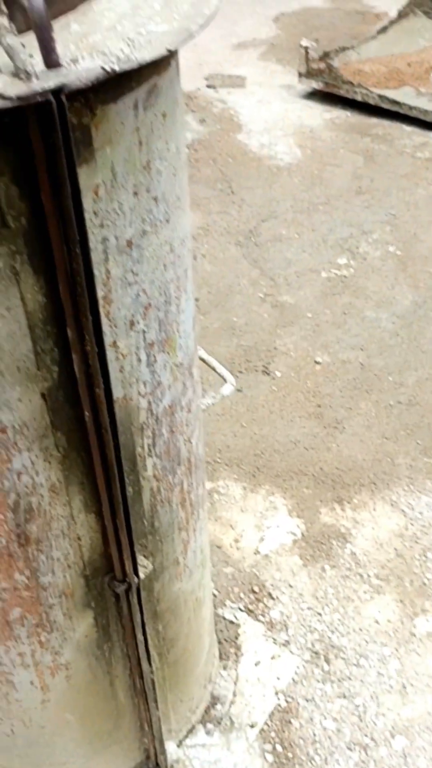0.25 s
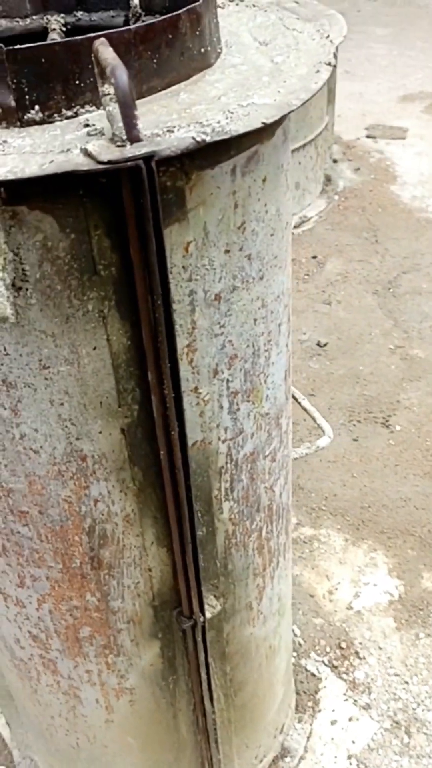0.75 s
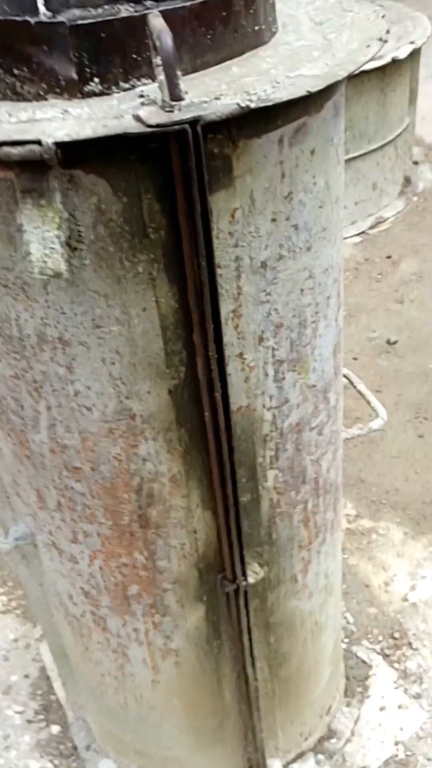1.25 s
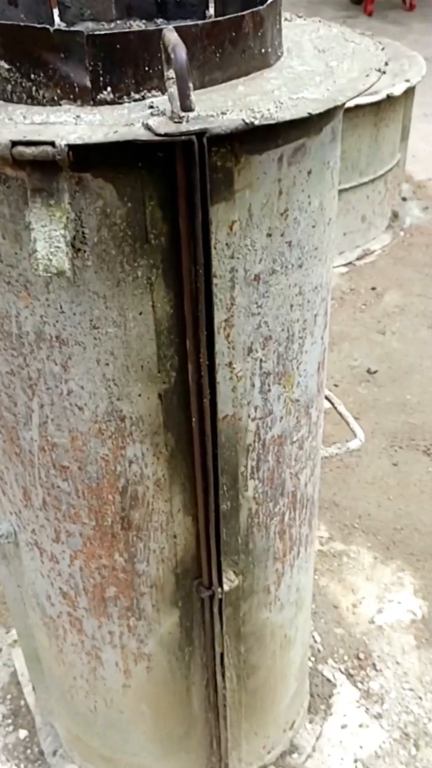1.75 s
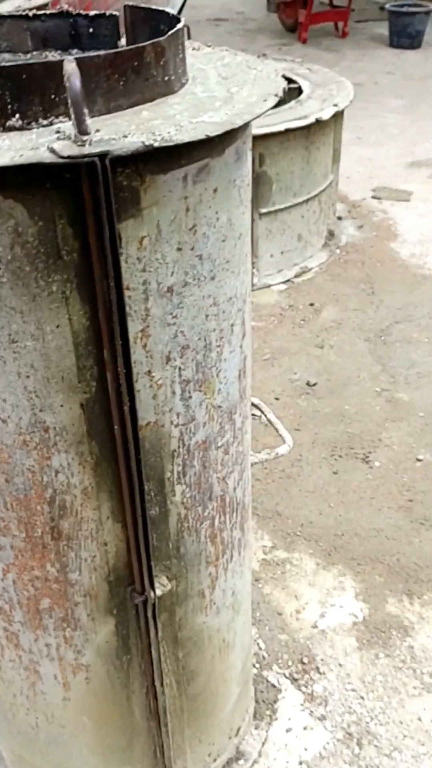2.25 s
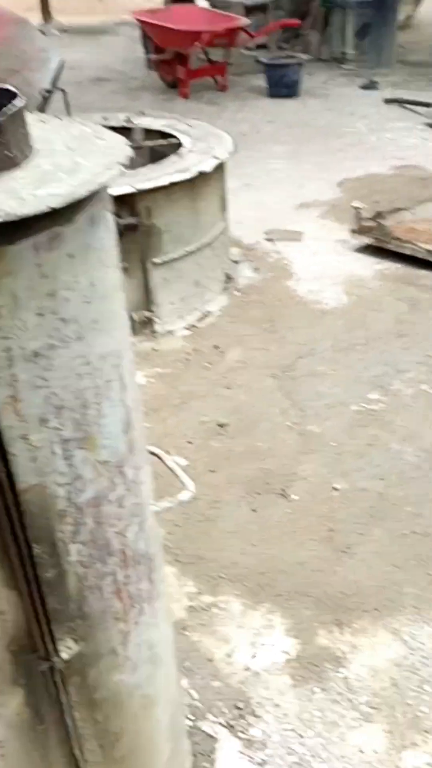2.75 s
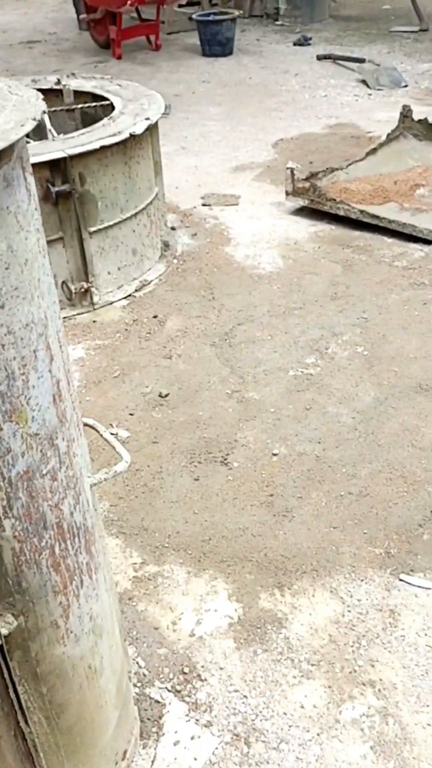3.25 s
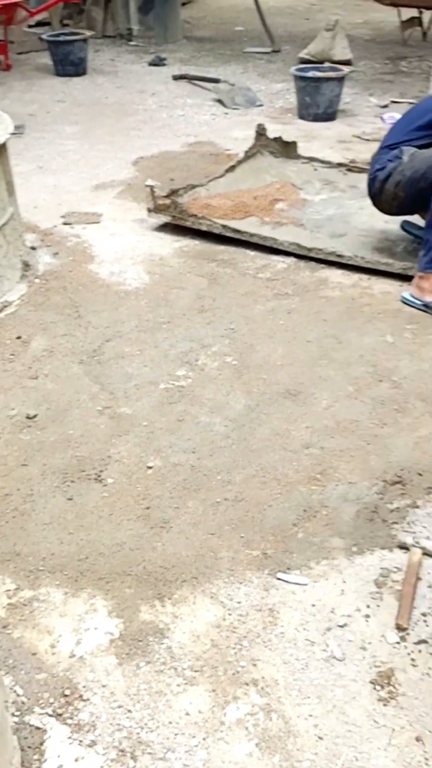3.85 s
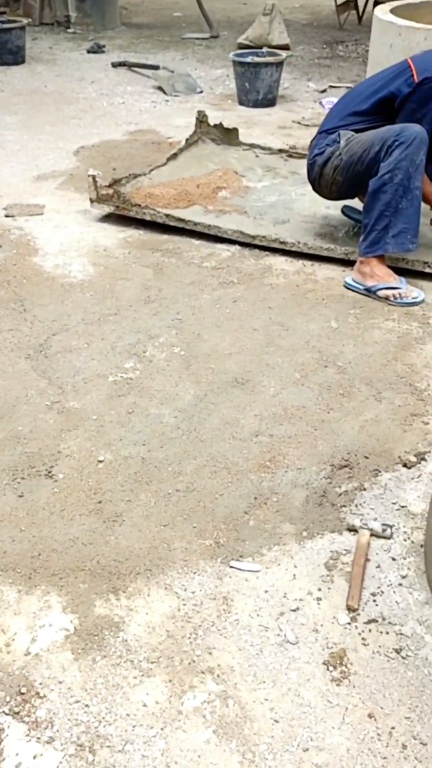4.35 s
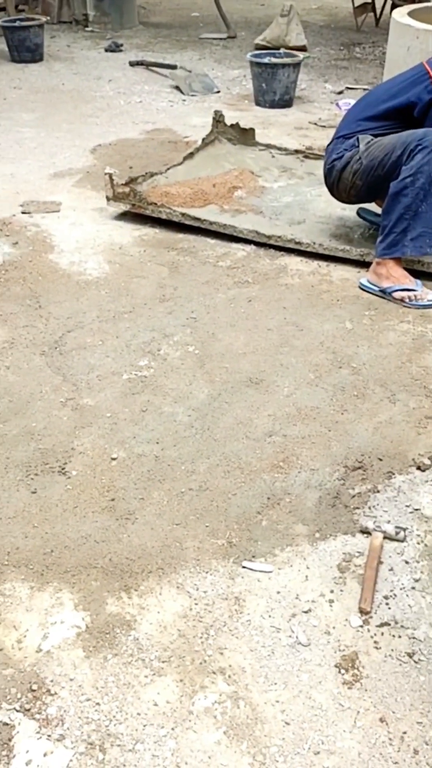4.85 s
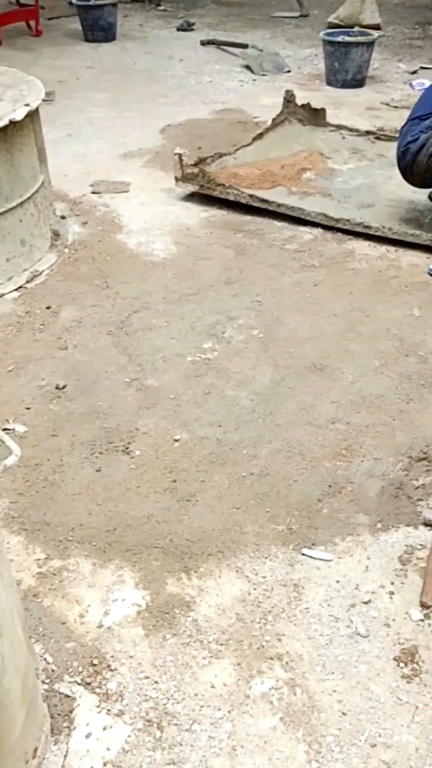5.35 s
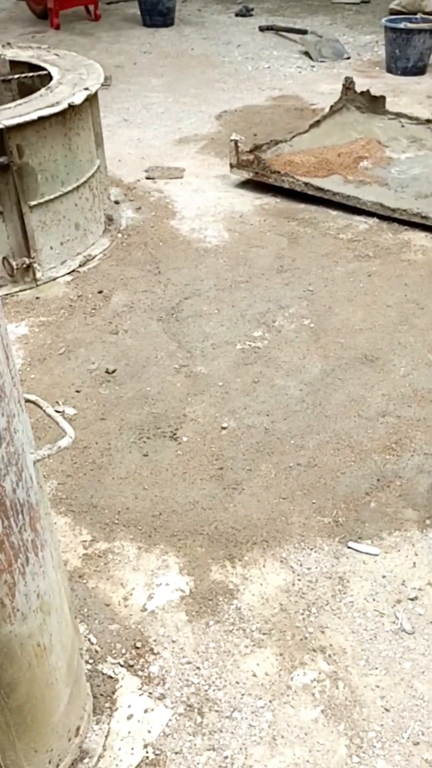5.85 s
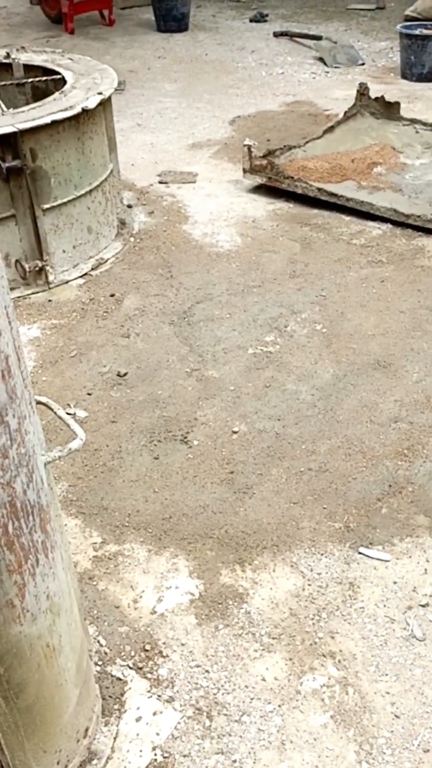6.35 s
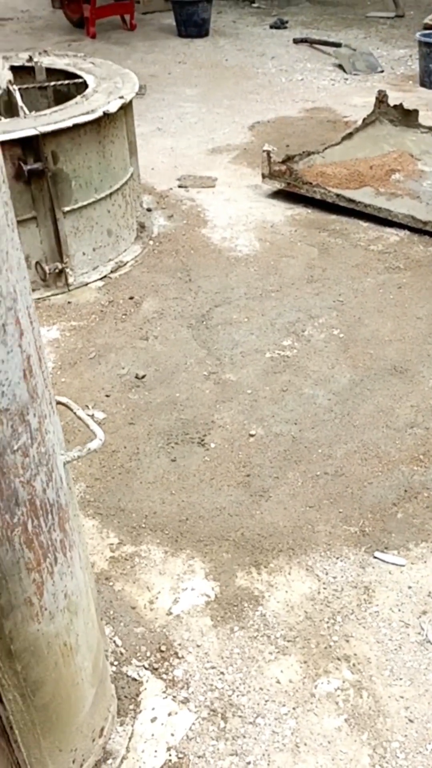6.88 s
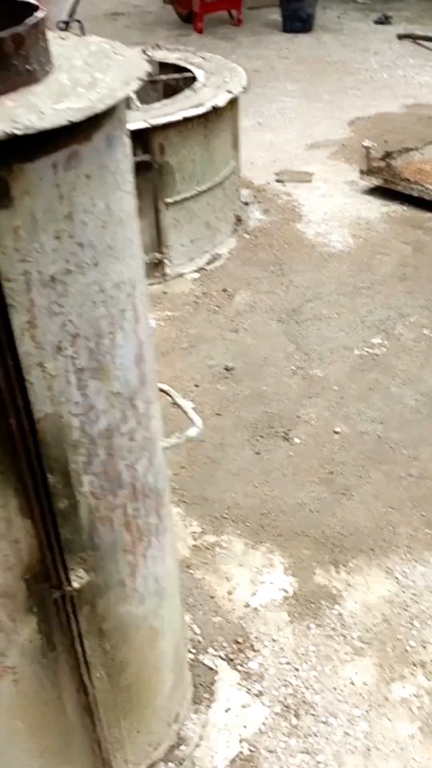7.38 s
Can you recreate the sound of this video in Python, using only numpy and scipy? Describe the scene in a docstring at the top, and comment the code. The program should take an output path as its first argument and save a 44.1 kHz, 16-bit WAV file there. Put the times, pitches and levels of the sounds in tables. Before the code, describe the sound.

Close, dry outdoor sound of a shovel working wet gritty concrete on a steel tray. Uneven drags rasp and boom from the start, stones knock and chips tick, and the metal edge clangs around three and five seconds. After a last hard pair of scrapes the work stops, leaving a few small scuffs and very faint air.

```python
"""An open yard: a shovel scrapes wet, gritty concrete over a steel tray, above a faint wash of air.
Filtered noise and grains, levelled stroke by stroke, make the tray boom, the blade rasp and the sand hiss.
Loose stones knock and chips tick as short damped tones; the edge clangs in pairs of beating tones.
Gliding narrow noise bands ring, scuff, hum and squeal."""
import sys
import numpy as np
from scipy import signal
from scipy.fft import rfft, irfft, next_fast_len
from scipy.io import wavfile
from scipy.ndimage import uniform_filter1d, map_coordinates

SR = 44100
rng = np.random.default_rng(int(sys.argv[2]) if len(sys.argv) > 2 else 0)


def unload_wav(signal):
    """Save mono or channel-first audio to the path in sys.argv[1] as 16-bit WAV at rate SR, clipped to [-1, 1]."""
    wavfile.write(
        sys.argv[1],
        SR,
        np.round(np.clip(np.atleast_2d(signal).T, -1, 1) * 32767).astype(np.int16),
    )


N = 336042  # samples
TOP_HZ = 15800  # band limit

# Yard spectrum. Each row: frequency in Hz, relative level in dB.
YARD_SPECTRUM = [(25, -31), (70, 4), (150, -3.5), (300, -13), (1000, -18), (2000, -16), (5000, -26),
                 (7000, -9), (7600, -32), (12000, -22), (15300, -18), (16400, -21.5)]
YARD_RMS_DB = -56

# Narrow moving bands. Each row: start in s, end in s, start in Hz, end in Hz, width in Hz,
# rms in dB before the swell and fade.
WARBLE_BANDS = [(0.301, 0.363, 936, 974, 141, -11.5), (1.639, 1.944, 1201, 1230, 178, -20.5),
                (2.112, 2.435, 1150, 1200, 246, -36), (2.856, 2.919, 884, 895, 216, -30),
                (2.927, 2.951, 860, 790, 248, -25.5), (3.105, 3.239, 2240, 2380, 200, -23),
                (3.507, 3.677, 1834, 2060, 80, -37), (3.595, 3.694, 3050, 3070, 80, -42),
                (5.104, 5.403, 127.2, 134.7, 41, -38), (5.508, 5.74, 351, 341, 35, -38),
                (5.086, 5.368, 3480, 3320, 189, -41.5), (5.147, 5.369, 2735, 2630, 130, -41.5),
                (5.69, 5.957, 1484, 1670, 69, -52.5), (5.752, 5.829, 1990, 2150, 110, -38),
                (5.801, 5.954, 2153, 2140, 219, -44), (5.796, 5.96, 2760, 2670, 99.8, -53),
                (5.827, 5.983, 4110, 4270, 120, -42), (5.945, 6.044, 4000, 3860, 305, -43.5),
                (6.132, 6.282, 2670, 2640, 99, -45), (6.34, 6.434, 5480, 5260, 253, -55),
                (6.327, 6.389, 1180, 1180, 203, -47), (6.453, 6.52, 830, 825, 117, -43.5),
                (6.514, 6.569, 820, 790, 98, -26.5), (6.532, 6.6, 443, 444, 80, -48),
                (6.785, 6.857, 840, 808, 120.6, -46), (7.051, 7.423, 14600, 13040, 3540, -53.5),
                (5.8, 6.018, 14650, 14800, 1500, -53.5), (7.395, 7.44, 1860, 2010, 80.6, -38.5),
                (7.425, 7.574, 448, 447, 61, -46), (7.486, 7.62, 86, 86, 30.3, -46.5)]
SOFT_ENDS = 0.46  # share of a warble spent swelling and fading

# Ringing modes of the edge. Each row: frequency in Hz, t60 in s.
EDGE_MODES = [(4130, .12), (5220, 0.15), (6110, 0.16)]
# Edge striking steel. Each row: start in s, then the level in dB of each edge mode's first tone.
EDGE_STRIKES = [(3.049, -36, -22, -30.5), (4.962, -16, -27, -27.5), (5.328, -35.5, -42.5, -26.5)]

# Chips ticking. Each row: start in s, peak in dB, pitch in Hz.
CHIP_TICKS = [(0.1422, -19, 4150), (0.339, -12.5, 5400), (0.824, -18, 4770), (0.8545, -7.5, 15120),
              (1.5299, -24, 15530), (2.0278, -25.5, 6300), (2.156, -20.5, 12830), (2.228, -21.5, 15640),
              (2.3151, -6.5, 12470), (3.9943, -18, 15200), (4.75, -33, 12500), (4.814, -21.5, 11000),
              (4.868, -25, 12500), (5.3976, -8.5, 15000), (5.5354, -20.5, 7350), (7.429, -31, 4040)]
# Stones knocking. Each row: start in s, tone peak in dB before the rattle, pitch in Hz,
# crack in dB relative to the tone peak.
STONE_KNOCKS = [(0.169, -4.5, 1300, -23), (0.245, -7.5, 2180, -23.5), (0.259, 2.5, 1320, -32.5),
                (0.298, -7.5, 2030, -6), (0.382, -3, 4600, -11.5), (0.579, -0.5, 1240, -50),
                (0.621, -3.5, 1850, -12), (0.665, 0.5, 1440, -15), (1.02, -2, 2024, -23),
                (1.028, 3, 1260, -16.5), (1.659, -0.5, 1110, -1), (1.978, -9, 1685, -33.5),
                (1.992, 6, 1186, -27), (2.058, -9.5, 4840, -8), (2.072, -14.5, 1380, -14.5),
                (2.121, -15, 1030, -22.5), (2.241, -12, 1175, -19), (2.296, -15.5, 1050, -22.5),
                (3.025, -13.5, 850, -10), (3.3235, -18.5, 1406, -25.5), (3.327, 3, 1282, -11),
                (3.357, -8, 1203, 2), (3.386, -16.5, 1460, -31.5), (3.41, -15, 1600, -28.5),
                (3.4125, -13, 1700, -25.5), (3.445, -17.5, 1080, -23.5), (3.452, 3, 1480, 2),
                (4.118, -8.5, 1360, -20), (4.175, -6, 1250, -5), (4.202, -13, 1140, -22.5),
                (4.238, -13, 1270, -18.5), (4.255, -16.5, 1175, -11), (4.968, -1.5, 903, -2.5),
                (5.071, 0, 1353, -7.5), (5.403, -0.5, 1470, -0.5), (6.062, -6.5, 2270, -8.5),
                (6.077, -9.5, 2300, -15.5)]

# Tray response. Each row: frequency in Hz, relative level in dB.
TRAY_SPECTRUM = [(24, -71.5), (40, -44.5), (150, -11), (221, -13.5), (305, 5), (383, -1), (425, -1),
                 (540, -9.5), (620, -12), (810, -54.5), (1360, -120)]
# Blade modes. Each row: frequency in Hz, width in Hz, relative level in dB.
BLADE_MODES = [(761, 25, 4), (929, 24, 4), (1980, 190, -5), (2430, 240, -4.5), (3340, 40, -5),
               (4393, 53, -5.5), (5015, 620, -15.5), (6200, 83, -20), (6380, 170, -15.5)]
# Blade response between its modes. Each row: frequency in Hz, relative level in dB.
RASP_SPECTRUM = [(500, -38), (700, 3.5), (1200, 0), (2500, -9), (4000, -14), (7000, -56.5)]
# Sand spectrum. Each row: frequency in Hz, relative level in dB.
SAND_SPECTRUM = [(1470, -39), (2500, -3), (4100, -4), (5990, -3.5), (8080, -17.5), (10500, -17),
                 (13600, -8.5), (15200, 2), (16000, -5.5), (16400, -30)]

# Pushes and drags of the edge. Each row: bite in s, swell in s, hold in s, fade in dB per s (before
# the shares below), bite under the top in dB (likewise), top levels of tray boom, blade rasp and
# sand hiss in dB, blade's upper modes in dB.
STROKES_TABLE = [(0.0, 0.0063, 0.034, 135, -17.5, -18, -13, -27, -6),
                 (0.134, 0.19, 0.13, 197.5, 15.5, -15, -14, -25.5, -1.5),
                 (0.555, 0.044, 0.15, 197, 7.5, -30.5, -35.5, -42, 3.5),
                 (0.676, 0.17, 0.02, 202.5, 10.5, -13, -16, -31, -2.5),
                 (0.873, 0.062, 0.063, 153, 5, -16.5, -16, -23, -1.5),
                 (1.075, 0.12, 0.11, 222.5, -2.5, -17.5, -21, -31.5, -1),
                 (1.417, 0.13, 0.11, 203.5, 13.5, -17.5, -19.5, -28.5, -4),
                 (1.611, 0.081, 0.17, 141.5, 19, -11, -14.5, -23.5, -2),
                 (2.024, 0.019, 0.02, 302, 5.5, -41, -30.5, -39, 6.5),
                 (2.111, 0.012, 0.033, 201.5, 4, -22, -35, -38, -11.5),
                 (2.196, 0.06, 0.15, 244.5, 1.5, -21, -28, -36, -6.5),
                 (2.511, 0.014, 0.084, 295.5, -2, -24, -30.5, -36.5, -5.5),
                 (2.611, 0.044, 0.044, 293, 13, -10, -9.5, -28.5, -9),
                 (2.79, 0.057, 0.24, 248, 9.5, -27, -38.5, -46, -5),
                 (3.045, 0.0081, 0.015, 249.5, 2.5, -17, -19, -26.5, -1),
                 (3.085, 0.064, 0.045, 226.5, 11.5, -12, -12.5, -22, -2.5),
                 (3.272, 0.02, 0.15, 149, 0.5, -53, -38.5, -41, 9),
                 (3.504, 0.047, 0.21, 305, 12, -31.5, -36.5, -49, 0),
                 (3.68, 0.047, 0.092, 196, 8, -10.5, -11.5, -22, -2),
                 (3.946, 0.24, 0.091, 241, 10.5, -26.5, -25.5, -33, -6),
                 (4.349, 0.0097, 0.01, 251, 2, -7, -14, -27.5, -5.5),
                 (4.391, 0.054, 0.15, 287, 2.5, -9.5, -13.5, -23.5, -2),
                 (4.673, 0.011, 0.017, 151.5, -1, -26.5, -27.5, -37, -6),
                 (4.793, 0.018, 0.19, 289.5, 3.5, -30.5, -39.5, -40, -14.5),
                 (4.956, 0.014, 0.016, 301, 4.5, -17.5, -20, -23, 3),
                 (5.003, 0.023, 0.025, 251, 9.5, -11, -11, -25.5, 0.5),
                 (5.326, 0.0097, 0.01, 248, 6, -11.5, -22, -25.5, 1),
                 (5.361, 0.039, 0.013, 280.5, 5.5, -11, -15, -24.5, 1),
                 (5.505, 0.011, 0.15, 285, -2.5, -36, -46.5, -43, -20.5),
                 (6.03, 0.037, 0.017, 337.5, 8, -30.5, -19, -21.5, 4.5),
                 (6.16, 0.17, 0.084, 2499.5, 8.5, -76, -61, -44.5, 8),
                 (6.521, 0.022, 0.026, 401, -5.5, -55, -35.5, -52, 0),
                 (6.637, 0.05, 0.034, 242, 11, -68, -55, -53.5, 26),
                 (6.785, 0.035, 0.0093, 401, 17.5, -49, -44, -53.5, 12.5),
                 (7.123, 0.059, 0.022, 75, 12.5, -73, -70, -59.5, 6),
                 (7.422, 0.033, 0.014, 248.5, 5.5, -56.5, -41.5, -45, 34.5)]
BITE_S = 0.0033
# Share of the swell followed. Entries: tray, blade, sand.
SWELL_SHARES = [0.62, 0.99, 0.96]
# Share of the stroke's fade followed. Entries: tray, blade, sand.
FADE_SHARES = [0.76, 0.99, 0.69]


def amp(db):
    """Gain of a level in dB."""
    return 10 ** (np.asarray(db) / 20)


def unit(x):
    """x at rms 1."""
    return x / np.sqrt(np.mean(x ** 2) + 1e-20)


def shape(points):
    """Gain of (Hz, dB) points joined on a log axis."""
    points_hz, points_db = np.transpose(points)
    return lambda hz: amp(np.interp(np.log(hz + 1), np.log(points_hz + 1), points_db))


def filtered(x, response):
    """x times a complex response of frequency."""
    size = next_fast_len(N + 8192)
    spectrum = rfft(x, size) * response(np.fft.rfftfreq(size, 1 / SR))
    return irfft(spectrum, size)[..., :N]


def wobble(knots_per_s):
    """A smooth random curve through random knots."""
    knots = rng.standard_normal(int(N * knots_per_s / SR) + 4)
    return map_coordinates(knots, [np.arange(N) * knots_per_s / SR])


def sparse(rate_per_s):
    """Random impulses at random times."""
    return (rng.random(N) < rate_per_s / SR) * rng.standard_normal(N)


def grit(grains_per_s, spread_db, grain_share, patchy_db, linger_s):
    """White excitation: noise whose narrow bands linger, plus a power share of single grains breaking."""
    stft = signal.stft(rng.standard_normal(N), nperseg=1024, noverlap=896)[2]
    patches = uniform_filter1d(rng.standard_normal(stft.shape), size=2, axis=0)
    patches = uniform_filter1d(patches, max(round(linger_s * SR / 128), 1), 1)
    patch_gain = amp(patchy_db * np.clip(unit(patches), -2, 2))
    noise = signal.istft(stft * patch_gain, nperseg=1024, noverlap=896)[1][:N]
    grains = sparse(grains_per_s) * amp(spread_db * np.clip(rng.standard_normal(N), -2, 2))
    return np.sqrt(1 - grain_share) * unit(noise) + np.sqrt(grain_share) * unit(grains)


def yard():
    """Faint wash of air and distance: shaped, slightly patchy noise."""
    wash = grit(300, 3, 0, 3, linger_s=0.1)
    return amp(YARD_RMS_DB) * unit(filtered(wash, shape(YARD_SPECTRUM)))


def warbles():
    """Narrow bands of noise with soft skirts that glide, swell and fade."""
    out = np.zeros(N)
    for start_s, end_s, from_hz, to_hz, width_hz, rms_db in WARBLE_BANDS:
        a, n = round(start_s * SR), round((end_s - start_s) * SR)
        skirt = 1 + (np.fft.rfftfreq(n, 1 / SR) / width_hz) ** 6
        slow = irfft(rfft(rng.standard_normal((2, n))) / skirt, n)
        phase = 2 * np.pi * np.cumsum(np.linspace(from_hz, to_hz, n)) / SR
        band = slow[0] * np.cos(phase) + slow[1] * np.sin(phase)
        out[a:a + n] += amp(rms_db) * unit(band) * signal.windows.tukey(n, SOFT_ENDS)
    return out


def clangs():
    """The edge rings as it lands, each mode a close pair that beats."""
    out, t = np.zeros(N + SR), np.arange(SR // 4) / SR
    onset = 1 - np.exp(-t / 0.00076)
    for start_s, *levels_db in EDGE_STRIKES:
        for (hz, t60_s), db in zip(EDGE_MODES, levels_db):
            twin_hz = hz + rng.normal(0, 76)
            pair = np.sin(2 * np.pi * hz * t) + 0.68 * np.sin(2 * np.pi * twin_hz * t)
            out[round(start_s * SR):][:len(t)] += amp(db - 60 * t / t60_s) * pair * onset
    return out[:N]


def knocks(rows, decay_cycles, rise_cycles):
    """Each knock is a damped tone, with a brief noise crack where the row gives one.

    Time constants are the given cycles over the pitch; rise and decay both are exponential.
    """
    out, t = np.zeros(N + SR), np.arange(SR // 50) / SR
    crack_fade = amp(-60 * t / 0.004)  # t60 4 ms
    for start_s, peak_db, hz, *crack_db in rows:
        envelope = np.exp(-t * hz / decay_cycles) * (1 - np.exp(-t * hz / rise_cycles))
        tone = np.sin(2 * np.pi * hz * t) * envelope
        sound = tone / np.abs(tone).max()
        for db in crack_db:
            crack = crack_fade * rng.standard_normal(len(t))
            # fixed crack energy
            sound = sound + amp(db) * crack * np.linalg.norm(crack_fade) / np.linalg.norm(crack)
        out[round(start_s * SR):][:len(t)] += amp(peak_db) * sound
    return out[:N]


def rattle(x):
    """A knock returns off the ground, then scatters among the steel; little bass, dull around 9 kHz."""
    t = np.arange(SR // 10) / SR
    tail = unit(rng.standard_normal(len(t)) * amp(-60 * t / 0.064)) / np.sqrt(len(t))  # t60 64 ms
    echo = np.pad(x, (round(0.002 * SR), 0))[:N]
    scatter = signal.fftconvolve(echo, tail)[:N]
    heard = x + amp(-13) * echo + amp(-14) * scatter

    def tint(hz):
        """Bass cut, and a treble that falls and then returns toward the band limit."""
        bass_cut = hz ** 2 / (hz ** 2 + 550 ** 2)
        return bass_cut * np.sqrt(1 / (1 + (hz / 6000) ** 6) + 0.34 * (hz / TOP_HZ) ** 8)

    return filtered(heard, tint)


def blade(hz):
    """Blade response: resonant modes of alternating sign, power-summed with a broad response."""
    modes = 0
    for k, (mode_hz, width_hz, db) in enumerate(BLADE_MODES):
        damping = 1j * hz * width_hz
        modes = modes + (-1) ** k * amp(db) * damping / (mode_hz ** 2 - hz ** 2 + damping)
    return np.sqrt(np.abs(modes) ** 2 + shape(RASP_SPECTRUM)(hz) ** 2)


def stroke_levels():
    """Every stroke bites, swells, holds and fades; overlapping strokes add their power."""
    t = np.arange(N) / SR
    power, upper = np.full((3, N), 1e-9), np.zeros(N)
    for start_s, swell_s, hold_s, fade_db_per_s, under_db, *tops_db, upper_db in STROKES_TABLE:
        a = round(start_s * SR)
        u = t[:min(N - a, SR)]
        rise_db = under_db * np.clip(1 - u / max(swell_s, BITE_S), 0, 1)
        fall_db = fade_db_per_s * np.clip(u - swell_s - hold_s, 0, None)
        drop_db = np.outer(SWELL_SHARES, rise_db) + np.outer(FADE_SHARES, fall_db)
        bite = np.clip(u / BITE_S, 0, 1)
        part = (amp(np.c_[tops_db] - drop_db) * bite) ** 2
        power[:, a:a + SR] += part
        upper[a:a + SR] += upper_db * part[1]
    boom_db, rasp_db, hiss_db = 10 * np.log10(power)
    return boom_db, rasp_db, hiss_db, upper / power[1]  # upper: mean weighted by blade power


def shovel():
    """The edge judders over the grit, which shakes tray, blade and sand together."""
    boom_db, rasp_db, hiss_db, upper_db = stroke_levels()
    upper = amp(upper_db)
    judder, catch = wobble(30), wobble(75)

    tray_grit = grit(200, 2.1, 0.091, 6.0, linger_s=0.09)
    boom = amp(1.7 * judder + 0.96 * wobble(21)) * filtered(tray_grit, shape(TRAY_SPECTRUM))

    # a light touch leaves patchier noise than a heavy one
    heavy = np.clip((hiss_db + 45.0) / 14, 0, 1)
    light = grit(300, 3, 0.03, 8, linger_s=0.16)
    # pebbles snap under the edge, in blade and sand at once
    snaps = heavy * unit(sparse(90) * amp(2.6 * judder))

    blade_grit = np.sqrt((1 + heavy) / 2) * grit(800, 6, 0.16, 6.8, linger_s=0.06)
    blade_grit = blade_grit + np.sqrt((1 - heavy) / 2) * light + 0.35 * snaps
    rasp = filtered(blade_grit, blade)
    low = filtered(rasp, lambda hz: 1 / (1 + (hz / 1500) ** 6))
    balanced = (low + upper * (rasp - low)) / np.sqrt(2.5 + 0.081 * upper ** 2)
    rasp = amp(1.75 * judder + 1.4 * catch) * balanced

    sand = np.sqrt(heavy) * grit(3500, 5.2, 0.4, 6.5, linger_s=0.06)
    sand = sand + np.sqrt(1 - heavy) * light + 0.17 * snaps
    hiss_gain = amp(1.0 * judder + 1.0 * catch + 2.3 * wobble(40))
    hiss = hiss_gain * filtered(sand, shape(SAND_SPECTRUM))
    return amp(boom_db) * unit(boom) + amp(rasp_db) * unit(rasp) + amp(hiss_db) * unit(hiss)


def scene():
    """All sources, at one microphone."""
    stones = rattle(knocks(STONE_KNOCKS, decay_cycles=0.7, rise_cycles=2))
    chips = knocks(CHIP_TICKS, decay_cycles=7, rise_cycles=2)
    return (yard() + warbles() + clangs() + chips + stones + shovel())[None]


def record(dry):
    """The loudest peaks bend toward 0.95; nothing passes above the band limit."""
    bent = dry / (1 + np.abs(dry / 0.95) ** 5) ** (1 / 5)
    return filtered(bent, lambda hz: hz < TOP_HZ)


dry = scene()
out = record(dry)
unload_wav(out)
```